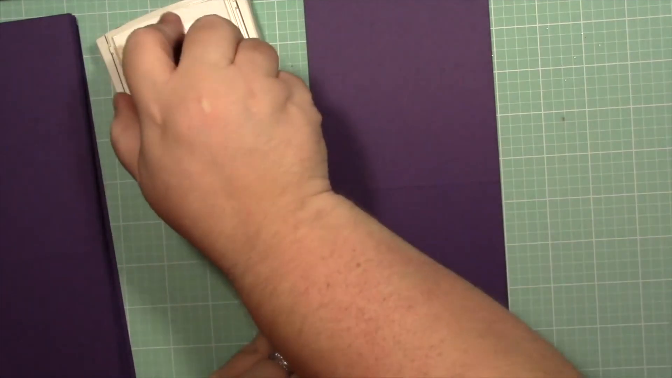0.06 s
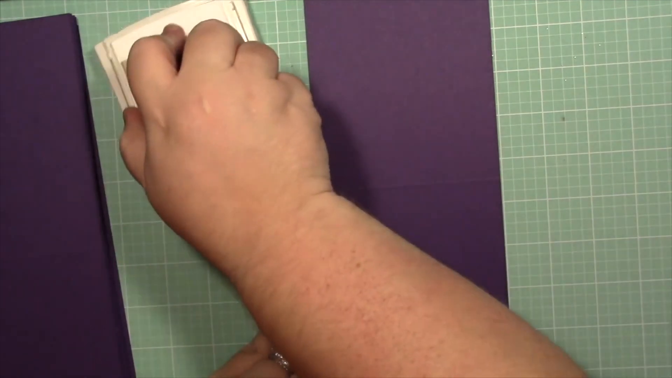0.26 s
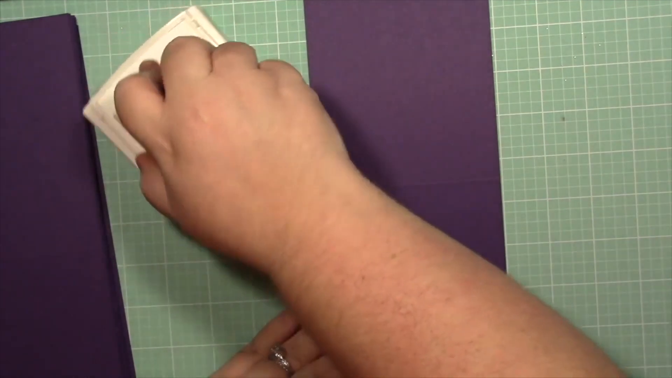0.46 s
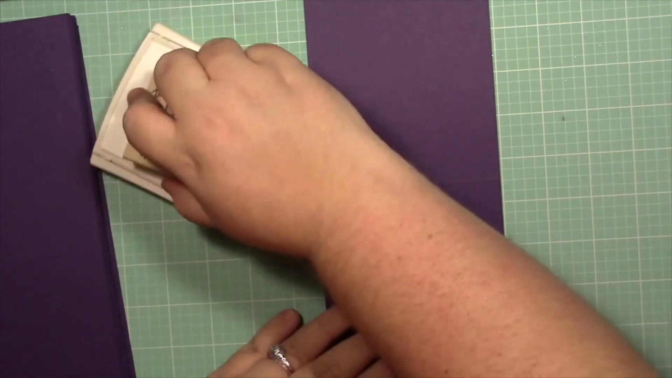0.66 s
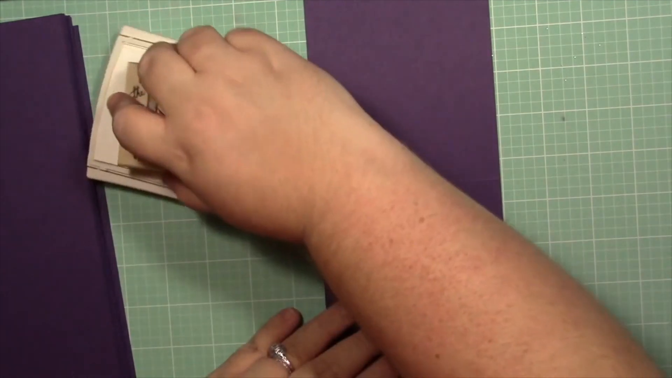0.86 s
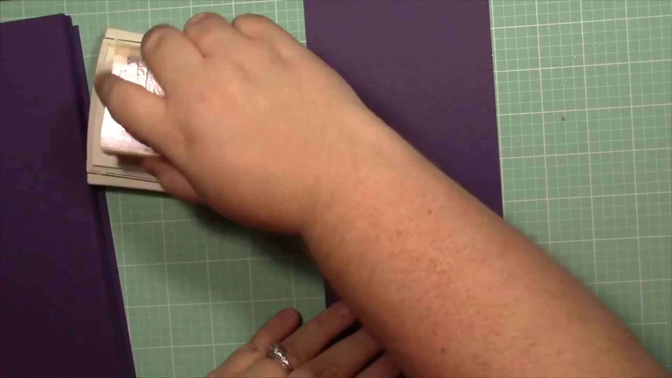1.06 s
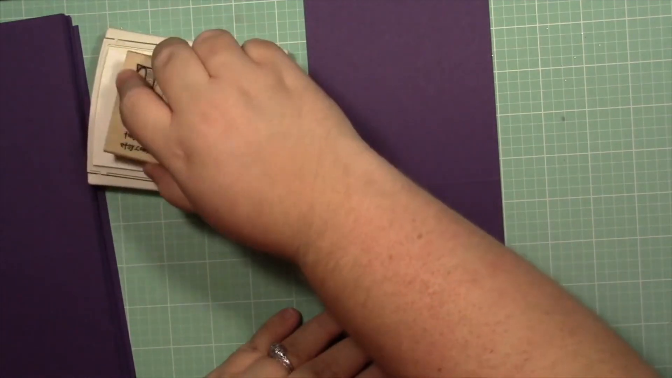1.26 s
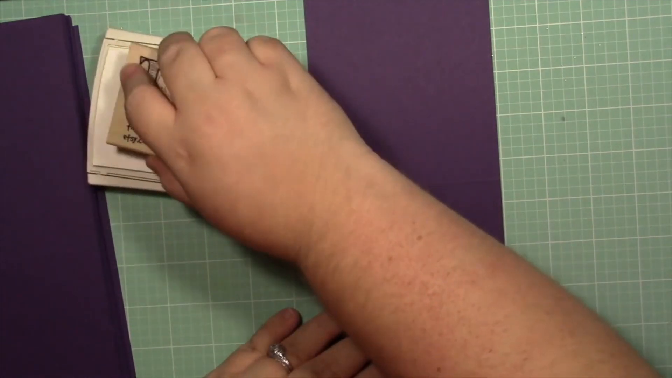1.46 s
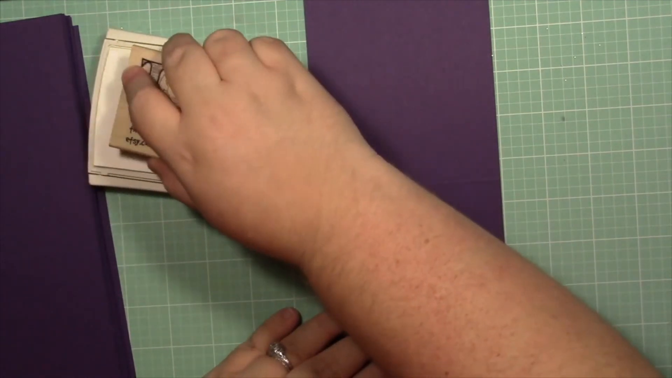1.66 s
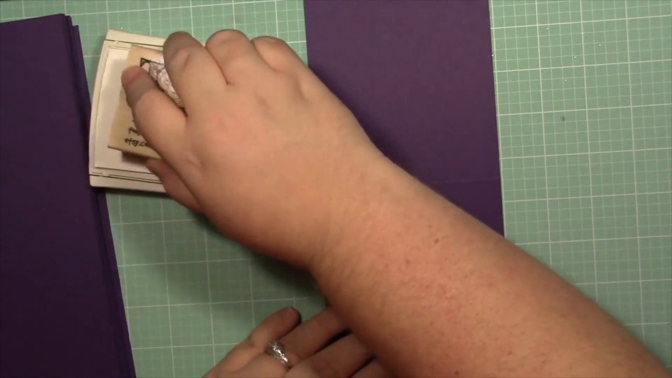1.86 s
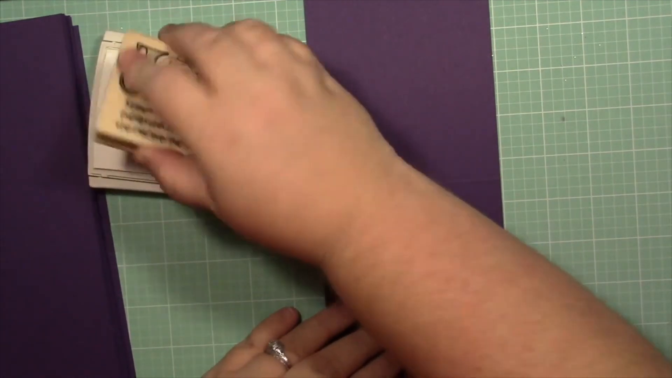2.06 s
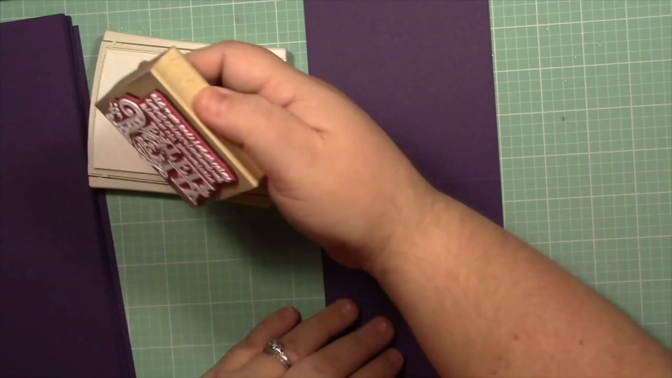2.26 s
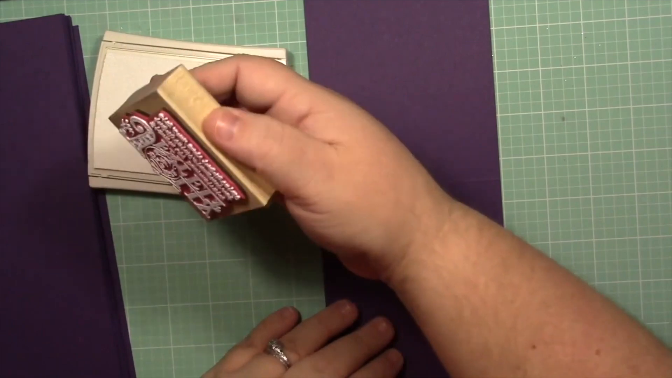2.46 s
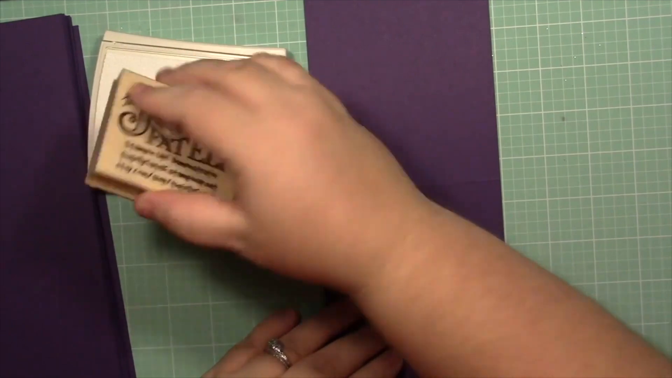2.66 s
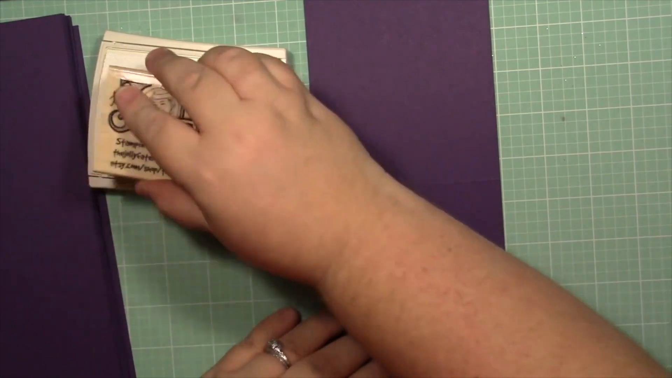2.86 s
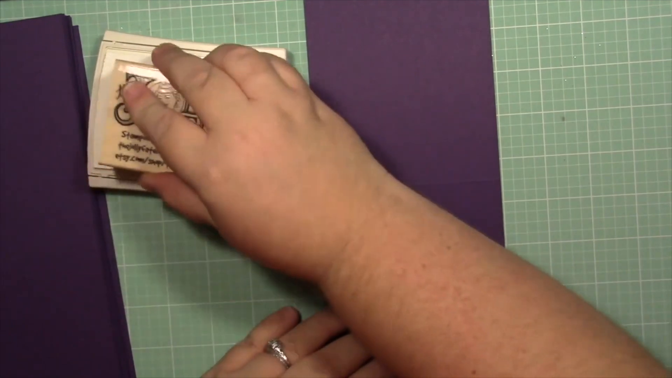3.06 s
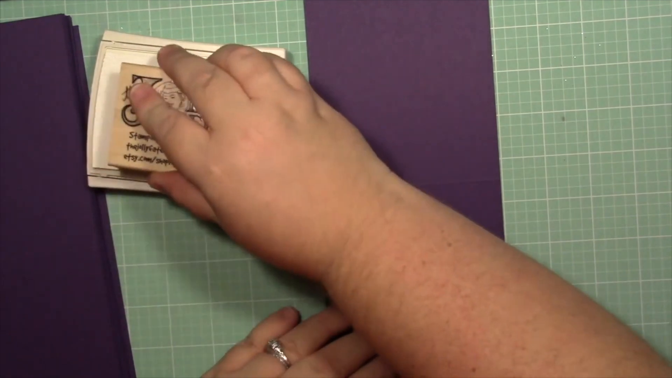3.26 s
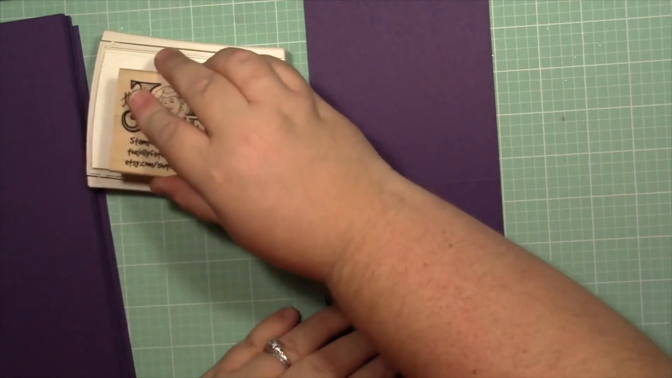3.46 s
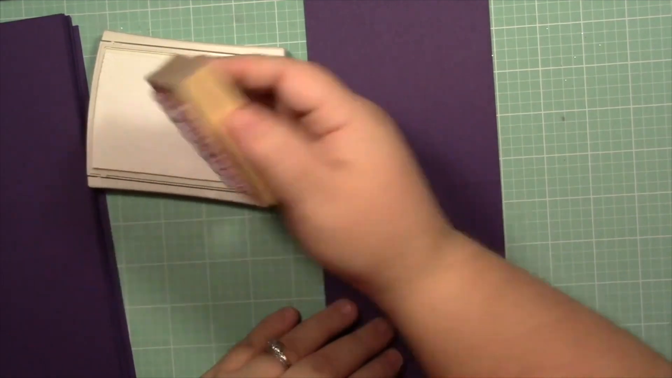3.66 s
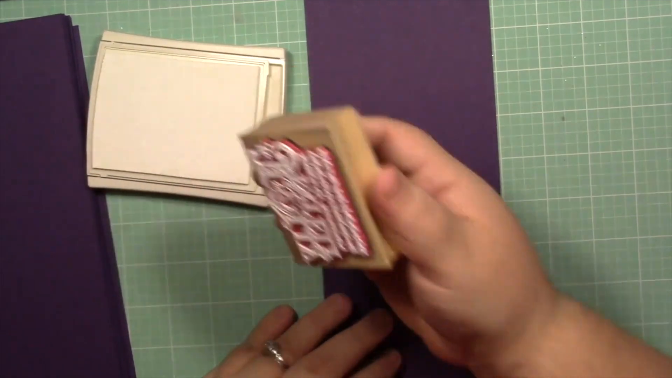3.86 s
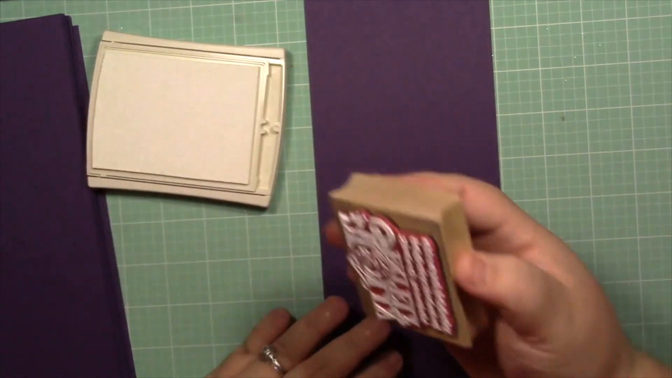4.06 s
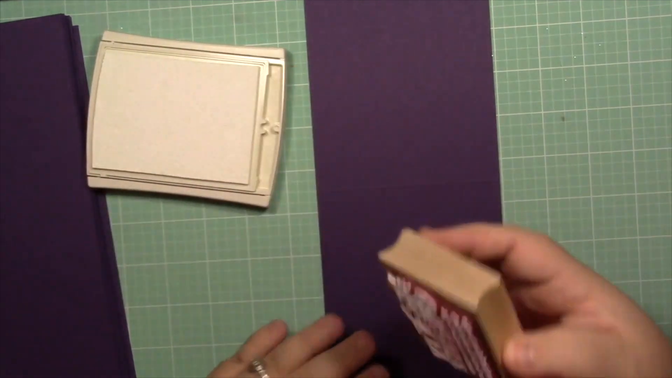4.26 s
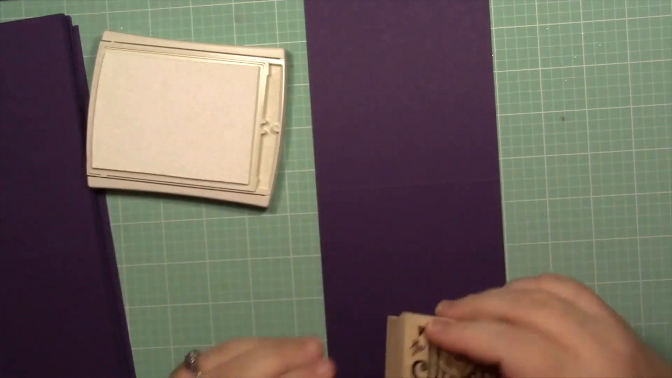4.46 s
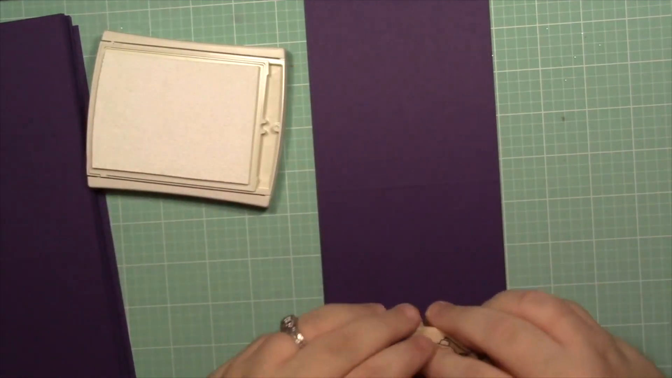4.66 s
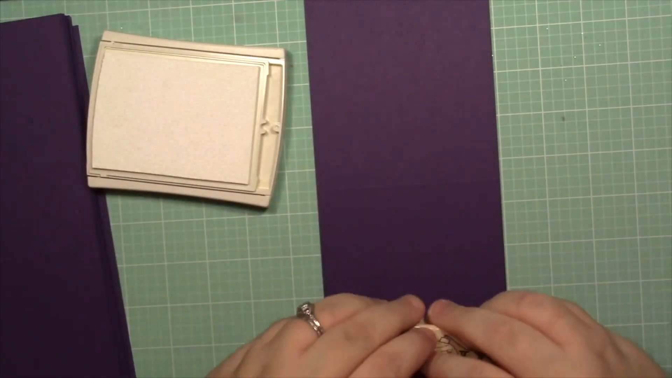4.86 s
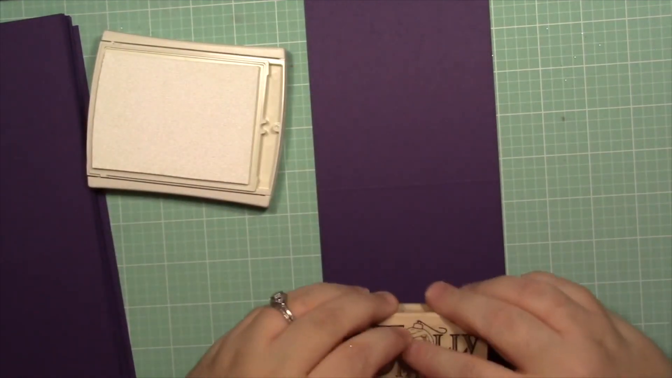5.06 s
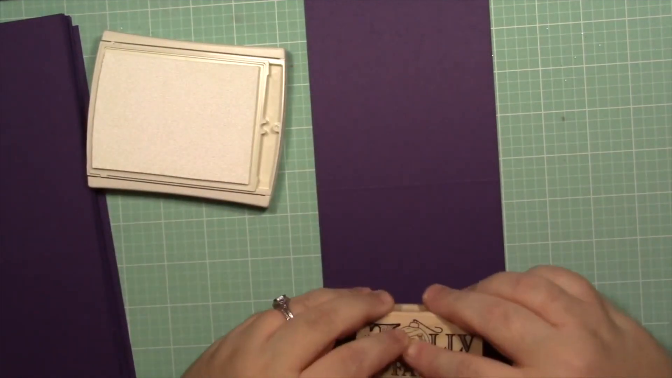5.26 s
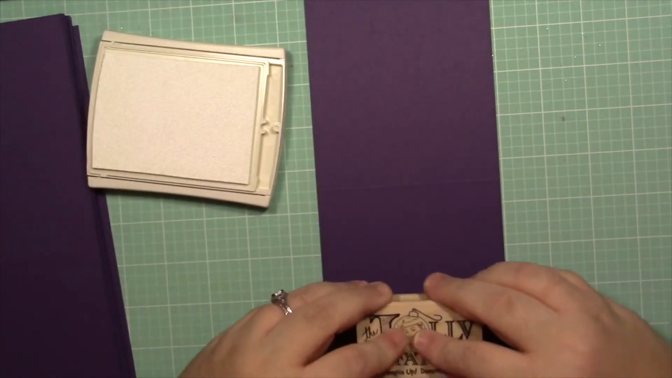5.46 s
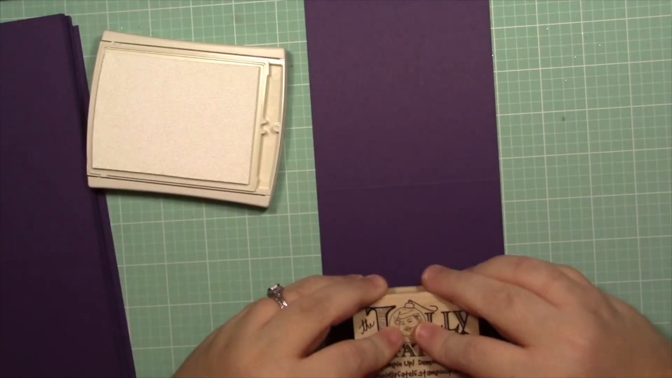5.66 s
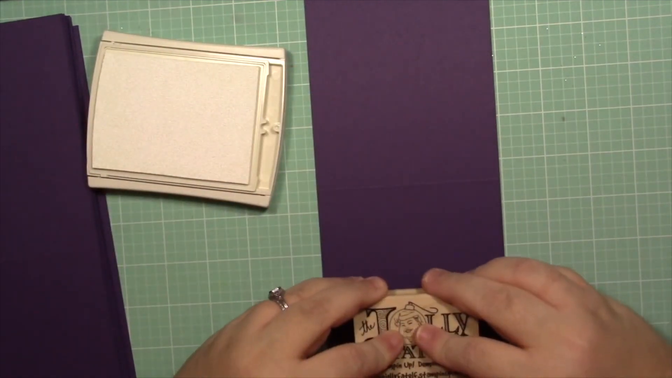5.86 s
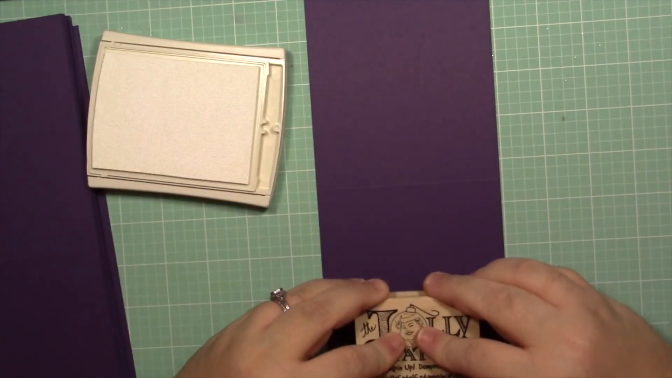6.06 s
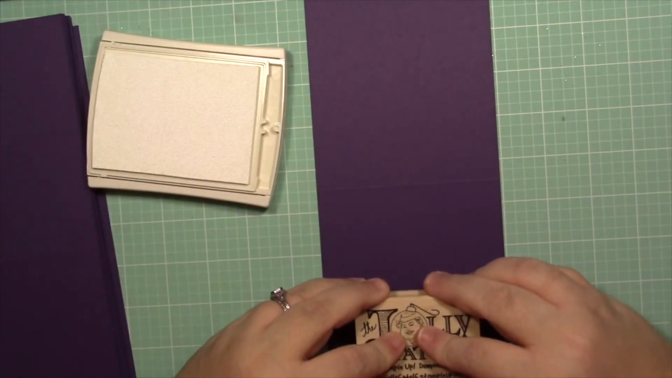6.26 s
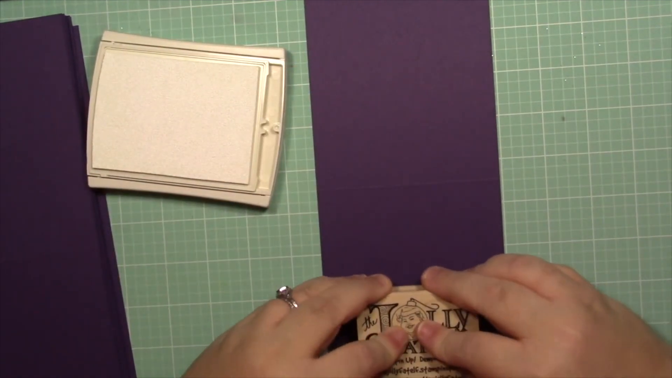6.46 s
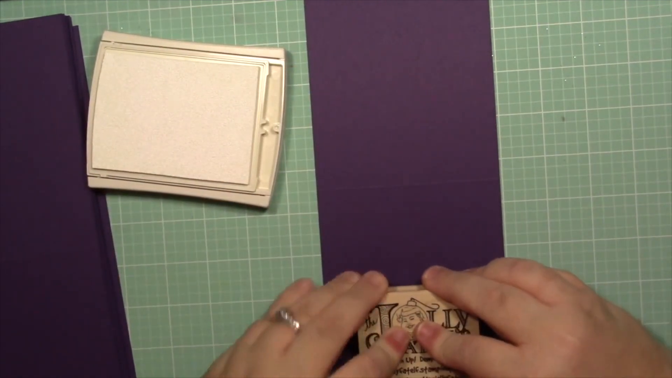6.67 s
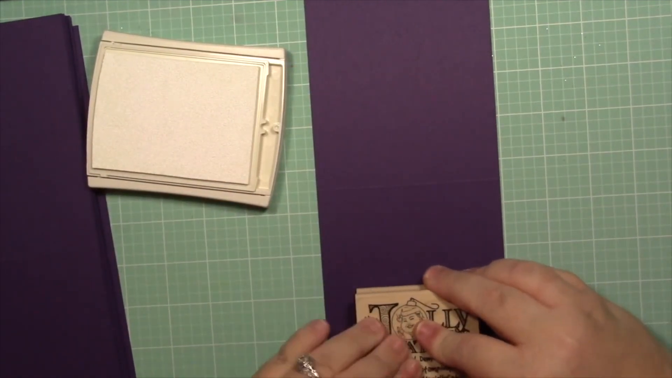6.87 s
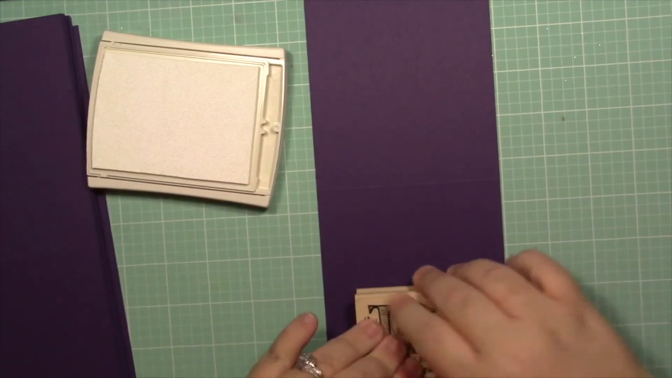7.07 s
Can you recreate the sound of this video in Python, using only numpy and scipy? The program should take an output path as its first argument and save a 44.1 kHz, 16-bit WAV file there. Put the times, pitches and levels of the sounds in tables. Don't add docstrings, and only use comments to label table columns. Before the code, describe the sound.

Close, dry craft-table sounds in a small room with a short reverberation. A medium wooden knock on a plastic ink pad comes at 0.15 s, over a faint table hum. From about 0.3 to 1.0 s the pad rasps over a mat in several short pushes, strongest near 0.45, with a slight squeal. A bunch of five hollow, sharp-edged knocks runs from 1.25 to 1.9 s, loud at 1.45 and 1.75 with lighter ones between. A second bunch runs from 2.9 to 3.5 s, loudest at 3.1, then fading. From 3.5 to 6.3 s there are only soft forearm rubs, sleeve and card rustle, fingertip pats and tiny sticky snaps, clustered near 5.05. At 6.45 s one firm, fuller knock lands on card and table, followed by pats and rustle. Faint motor ticks, about fifteen a second, and low room hiss continue throughout.

```python
import sys
import numpy as np
from scipy import signal
from scipy.fft import rfft, irfft, next_fast_len
from scipy.io import wavfile
from scipy.ndimage import uniform_filter1d

SR = 44100
rng = np.random.default_rng(int(sys.argv[2]) if len(sys.argv) > 2 else 0)


def unload_audio(sound):
    columns = np.transpose(np.atleast_2d(sound))
    steps = np.round(np.clip(columns, -1, 1) * 32767)
    wavfile.write(sys.argv[1], SR, steps.astype(np.int16))


def decibels_to_gain(level_db):
    exponent = np.asarray(level_db, float) / 20
    return 10 ** exponent


N = 313551
LEAD_S = 0.005
FRAME_PAIR_S = 1001 / 15000
CARD_FROM_S = 6

# start_s, force_db, block_pitch_hz, edge_crack_peak_db, table_thump_db
BLOWS = [(0.145, -23.5, 700, -26.5, -36.5), (1.2558, -31.5, 730, -33, -57.5), (1.4411, -9, 650, -9.5, -40),
         (1.613, -28, 606, -26, -48.5), (1.7621, -10.5, 622, -13.5, -40), (1.915, -21.5, 660, -23.5, -43.5),
         (2.9329, -21.5, 618, -16, -47.5), (3.1168, -9, 618, -9.5, -37), (3.2645, -23, 623, -19, -45.5),
         (3.407, -20, 542, -17.5, -38.5), (3.5, -30, 730, -26.5, -52), (6.4351, -5.5, 648, -15, -39)]
# until_s, lid_pitch_hz, rubber_squeeze_ms, lid_at_full_force_db,
# panel_against_lid_db
LANDING_SPOTS = [(1.1, 944, 1.8, -2, -13), (2.5, 962, 1.33, -5, -11.5), (3.3, 1000, 1.38, -8.5, -15),
                 (4.5, 1086, 0.8, -4.5, -18), (8.5, 1030, 1.2, -9.5, -28)]
# pitch_hz, level_db, t60_s
CASE_FLOOR = [(968.3, 3, 0.1), (730, -2, 0.091), (1176, -18, 0.19), (570.6, 0.5, 0.096), (647, -4, 0.18),
              (1540, -8, 0.047)]
# pitch_hz, level_db, t60_s
TABLE_TOP = [(91.4, -4, .33), (143.4, 11.5, 0.05), (201.6, 2, 0.18), (287.7, -6, 0.31)]
# centre_hz, width_hz, level_db
EDGE_ON_PAD = [(2646, 610, 4), (3330, 790, 2), (3950, 480, 4.5)]
# centre_hz, width_hz, level_db
EDGE_ON_CARD = [(1930, 760, -5), (2750, 540, -1), (3300, 570, -7), (4520, 300, -12)]
# centre_hz, width_hz, level_db
CONTACT_SIZZLE = [(5340, 500, -2), (6797, 180, 7), (8245, 2400, -6), (11000, 890, -13.5)]
# centre_hz, width_hz, level_db
BODY_AT_WALLS = [(740, 1300, 0)]
# centre_hz, width_hz, level_db
CRACK_AT_WALLS = [(3500, 4300, 0)]
# centre_hz, width_hz, level_db
SIZZLE_AT_WALLS = [(7000, 6900, 0)]
# delay_s, level_db
CEILING_ECHO = (.0132, -13)
# delay_s, level_db
WALL_ECHOES = [(0.022, -24), (.028, -25), (0.065, -32.5)]
# pitch_hz, t60_s
ROOM_DECAY = [(100, 1), (500, 0.38), (1500, 0.4), (4000, 0.42), (7000, 0.38), (12000, 0.92)]
# fastest_s, rasp_db, speeding_up_s, slowing_down_s
PAD_PUSHES = [
    (.305, -47, 0.047, 0.12),
    (.44, -37.5, 0.13, .1),
    (.574, -42.5, 0.073, 0.058),
    (.698, -53.5, 0.11, 0.05),
    (.89, -41.5, 0.1, 0.073),
    (1.03, -60, 0.2, 0.078),
]
# centre_hz, width_hz, level_db
CASE_RASP = [(1250, 300, -9), (1560, 260, -5), (1780, 120, 0), (2450, 250, -8)]
# centre_hz, width_hz, level_db
LID_SQUEAL = [(1743, 23, 16), (2480, 110, -8.5)]
# centre_hz, width_hz, level_db
SLIDE_DRONE = [(614, 210, 8.5), (1045, 320, 5)]
# pitch_hz, level_db_per_hz
SLIDE_HISS = [(1650, -37), (2800, -11), (3860, -13.5), (4210, -13.5), (4490, -17.5), (5980, -17.5),
              (6900, -22), (8370, -21), (15500, -37.5)]
# start_s, peak_db, centre_hz, body_against_peak_db
INK_SNAPS = [(.0378, -30, 6540, -17), (.1644, -43, 6440, -17), (1.0236, -45, 5030, 10),
             (1.2527, -47, 7000, -19), (1.268, -46, 7970, -20), (1.3352, -32.5, 6320, -24),
             (2.0075, -37, 6230, 6), (3.0268, -39.5, 5100, 16), (3.3396, -31.5, 6500, -3),
             (3.4946, -28.5, 6600, -18.5), (3.777, -47, 9800, 1), (3.828, -45, 9700, -20),
             (3.865, -54, 11000, -22), (4.2304, -49, 3000, -13), (4.7131, -49, 10000, -20),
             (4.8263, -45, 10000, -20), (4.9346, -46, 10900, -17), (5.0393, -33, 10150, -26),
             (5.0497, -34.5, 9950, -21), (5.0562, -29.5, 9560, -15), (5.0664, -32, 9800, -23),
             (6.003, -46, 3300, -2), (6.4774, -39, 3300, 0), (6.610, -48, 10200, 2),
             (6.6897, -53, 10500, -5), (6.7135, -48, 10000, -5), (6.757, -53, 7940, -5)]
# start_s, peak_db, pitch_hz
FINGER_PATS = [(4.0, -44, 487), (4.03, -48, 865), (4.93, -45, 875), (5.03, -54, 490), (6.03, -48, 860),
               (6.691, -33, 523), (6.713, -38, 298), (6.757, -45, 450), (6.79, -41, 298), (6.972, -40, 350)]
# fastest_s, level_db, speeding_up_s, slowing_down_s
FOREARM_RUBS = [(.01, -47.5, 0.056, 0.17), (3.56, -53.5, 0.07, 0.12), (3.85, -59, .15, .15),
                (4.01, -46.5, 0.045, 0.093), (4.25, -58, .04, .45), (4.79, -59, 0.15, .06),
                (4.94, -52.5, 0.037, 0.11), (5.04, -53.5, 0.098, 0.13), (6.01, -52.5, 0.044, 0.13),
                (6.59, -52, 0.03, 0.28), (6.72, -56, .06, 0.26), (7.03, -49, 0.1, 0.087)]
# fastest_s, cloth_db, speeding_up_s, slowing_down_s, card_db
SLEEVE_MOVES = [(3.82, -58, 0.37, 0.7, -65.5), (4.35, -57.5, 0.52, 0.25, -63.5),
                (4.7, -64.5, 0.45, .5, -69), (5.06, -59.5, .07, 0.076, -78), (6.005, -65, .06, .1, -70.5),
                (6.63, -59.5, 0.037, 0.33, -59.5), (7.02, -59.5, 0.096, 0.27, -64.5)]
# loudest_s, level_db, swell_s, fade_s
CARD_WHISTLE = [(4.87, -69, .26, .34)]
# pitch_hz, level_db_per_hz
RUB_COLOUR = [(150, -20), (250, -16.5), (429, -13), (492, -7), (666, -10.5), (876, -11), (2600, -23.5),
              (3380, -39), (5720, -120)]
# pitch_hz, level_db_per_hz
CLOTH_COLOUR = [(880, -25.5), (1500, -4.5), (2170, -12), (2730, -5), (3540, -8), (6000, -14), (7800, -40),
                (13200, -120)]
# pitch_hz, level_db_per_hz
CARD_COLOUR = [(3240, -32), (5500, -3), (10100, -4), (12300, -8), (13100, -7), (15500, -21.5)]
# start_s, extra_db
FIRM_MOTOR_STEPS = [(1.23, 4), (2.57, 6), (3.30, 4), (4.1, 3), (4.64, 3), (5.57, 4), (6.37, 8)]
# pitch_hz, level_db_per_hz
AIR_MID_COLOUR = [(15, -50.5), (25, -16.5), (59, -18.5), (97, -3.5), (149, 2.5), (309, 0.5), (384, 1),
                  (818, -4.5), (1020, -6), (1130, -7), (2160, -12), (2610, -14), (4250, -16),
                  (11300, -26.5), (16000, -35.5)]
# pitch_hz, level_db_per_hz
AIR_SIDE_COLOUR = [(15, -33.5), (25, -10.5), (335, 3.5), (451, 2), (1330, -7.5), (2280, -11.5), (4490, -30),
                   (6050, -35.5), (6560, -40), (16000, -46)]
# pitch_hz, level_db
MIC_RESPONSE = [(20, -30), (45, -6.5), (75, -1), (14000, -4.5), (16300, -23)]


def stamp(out):
    t = np.arange(SR // 3) / SR
    for s, force_db, block_hz, crack_db, thump_db in BLOWS:
        spot = next(spot for spot in LANDING_SPOTS if s < spot[0])
        rise = np.clip(spot[2], 0.6, 4) / 1000
        on_pad = s < CARD_FROM_S
        body = block_and_case(t, force_db, block_hz, spot, rise)
        crack, sizzle = edge_contact(t, crack_db, rise, on_pad)
        edge_hz = 1460 if on_pad else 1600
        thinned = filtered(push(t, BODY_AT_WALLS, body), lambda f: decibels_to_gain(-8 / (1 + (edge_hz / (f + 1)) ** 10)))
        sent = decibels_to_gain(-14) * body + decibels_to_gain(-9) * thinned + decibels_to_gain(-31) * push(t, SIZZLE_AT_WALLS, sizzle)
        crack_sent_db = -9 if on_pad else -19
        sent = sent + decibels_to_gain(crack_sent_db) * (push(t, CRACK_AT_WALLS, crack) + 0.22 * crack)
        echoes = sum(decibels_to_gain(db) * np.roll(body, round(lag * SR)) for lag, db in [CEILING_ECHO, *WALL_ECHOES])
        dry = (body + echoes) * [[1], [0.015]] + crack * [[1], [-0.04]] + sizzle * [[1], [-0.07]]
        add(out, room(dry, sent, side_db=-26), s - LEAD_S)
        add(out, decibels_to_gain(thump_db + 8) * thump(t), s - 0.002)
    add(out, decibels_to_gain(-31.5) * thump(t + 0.039), 0)


def block_and_case(t, force_db, block_hz, spot, rise):
    _, lid_hz, _, spot_db, panel_db = spot
    lid_db = spot_db + 0.64 * force_db
    hollow_db = -22 + 0.48 * force_db
    rim_db = lid_db - 10.5
    since = t - LEAD_S
    late = np.clip(since, 0, None)
    swell = np.exp(-((since - 0.002) / np.where(since < 0.002, rise, 0.0028)) ** 2)

    def wave(hz, t60, share):
        ringing = share * (late > 0.002) * decibels_to_gain(-60 * late / t60)
        return (swell + ringing) * np.cos(2 * np.pi * hz * (since - 0.0019))

    block = decibels_to_gain(force_db + 5.5) * wave(block_hz, t60=0.05, share=0.12)
    hollow = decibels_to_gain(hollow_db + 4.5) * wave(370, t60=0.02, share=0.2)
    lid = wave(lid_hz, t60=0.05, share=0.16) - 0.71 * wave(1217, t60=0.03, share=0.44)
    rim = wave(1647, t60=0.013, share=0.23) - 0.16 * wave(2015, t60=0.017, share=0.17)
    floor = sum(decibels_to_gain(db + 2 * rng.standard_normal()) * ring(late, hz, t60, rise=0.004)
                for hz, db, t60 in CASE_FLOOR)
    return block + hollow - decibels_to_gain(lid_db) * lid - decibels_to_gain(rim_db + 5) * rim + decibels_to_gain(lid_db + panel_db) * floor


def edge_contact(t, crack_db, rise, on_pad):
    since = t - LEAD_S
    late = np.clip(since, 0, None)
    burst = (late > 0) * np.exp(-(late / 0.004) ** 2)
    trail = 0.08 * (since > -rise) * decibels_to_gain(-60 * late / 0.027)
    grit = rng.standard_normal(len(t)) * (burst + trail)
    grit[round(LEAD_S * SR) + 8] -= 9
    edge = filtered(grit, peaks(EDGE_ON_PAD if on_pad else EDGE_ON_CARD))
    crack = decibels_to_gain(crack_db) * top(filtered(edge, peaks([(3000, 6600, 0)])))
    sizzle_db = -11.5 + 1.51 * crack_db
    sizzle = decibels_to_gain(sizzle_db + 11.5) * top(filtered(grit, peaks(CONTACT_SIZZLE)))
    return crack, sizzle


def thump(t):
    modes = [decibels_to_gain(db + 3.1 * rng.standard_normal())
             * ring(t, hz * (1 + 0.02 * rng.standard_normal()), t60, rise=0.004) for hz, db, t60 in TABLE_TOP]
    return sum(modes) * [[1], [0.03]]


def slide():
    rasp_db = strokes(PAD_PUSHES)
    grain = unit(decibels_to_gain(1.8 * unit(uniform_filter1d(rng.standard_normal(N), size=200))))
    squeal = decibels_to_gain(-4) * noise(peaks(LID_SQUEAL), patchy_db=1.5)
    rasp = decibels_to_gain(rasp_db) * (noise(peaks(CASE_RASP), patchy_db=0) + squeal)
    drone = decibels_to_gain(-17 + 0.58 * rasp_db) * noise(peaks(SLIDE_DRONE), patchy_db=3.5)
    hiss = decibels_to_gain(-23.5 + 0.63 * rasp_db) * noise(coloured(SLIDE_HISS), patchy_db=1.5)
    return grain * (rasp + drone + hiss)


def snaps(out):
    t = np.arange(SR // 20) / SR
    for s, peak_db, hz, body_db in INK_SNAPS:
        spit = rng.standard_normal(len(t)) * decibels_to_gain(-60 * t / 0.013)
        band = peaks([(0.47 * hz, 0.15 * hz, -12), (hz, 0.3 * hz, 0), (1.3 * hz, 0.35 * hz, -3)])
        spit = top(filtered(spit, band))
        tap = decibels_to_gain(body_db) * ring(t, 520, t60=0.0091, rise=0.0021)
        dry = spit * [[1], [-0.12]] + tap * [[1], [0]]
        add(out, decibels_to_gain(peak_db) * room(dry, decibels_to_gain(-12.5) * (spit + tap), side_db=-22), s)


def fingers(out):
    t = np.arange(SR // 20) / SR
    for s, peak_db, hz in FINGER_PATS:
        pat = ring(t, hz, t60=0.025, rise=0.0015) + 0.42 * ring(t, 0.52 * hz, t60=0.056, rise=0.002)
        add(out, decibels_to_gain(peak_db) * room(pat * [[1], [0.02]], decibels_to_gain(-12) * pat, side_db=-20), s)


def rustle():
    rub = decibels_to_gain(strokes(FOREARM_RUBS)) * noise(coloured(RUB_COLOUR), patchy_db=2.5)
    cloth_level = decibels_to_gain(strokes([row[:4] for row in SLEEVE_MOVES]))
    card_level = decibels_to_gain(strokes([(s, card_db, rise, fall) for s, _, rise, fall, card_db in SLEEVE_MOVES]))
    cloth = cloth_level * noise(coloured(CLOTH_COLOUR), patchy_db=2.5)
    card = card_level * noise(coloured(CARD_COLOUR), patchy_db=4)
    whistle = decibels_to_gain(strokes(CARD_WHISTLE)) * noise(peaks([(8300, 350, 0)]), patchy_db=1)
    return rub * [[1], [-0.1]] + (cloth + card + whistle) * [[1], [0]]


def focus_motor(out):
    t = np.arange(SR // 40) / SR
    count = int(N / SR / FRAME_PAIR_S) + 1
    for k, (size, pitch, kick) in enumerate(rng.standard_normal((count, 3))):
        s = 0.0298 + k * FRAME_PAIR_S
        extra_db = sum(db for when, db in FIRM_MOTOR_STEPS if abs(when - s) < FRAME_PAIR_S / 2)
        start = ring(t, 1850 * (1 + 0.06 * pitch), t60=0.013, rise=0.0007)
        start = start + (0.15 + 0.04 * extra_db) * ring(t, 4000, t60=0.013, rise=0.0005)
        stop = ring(t, 2100 * (1 + 0.04 * kick), t60=0.011, rise=0.0007)
        stop = np.roll(stop, round(0.0036 * SR))
        step = decibels_to_gain(-41 + 0.9 * size) * (decibels_to_gain(-3.5 + extra_db + 1.2 * kick) * start + stop)
        add(out, step * [[1], [-0.25]], s)


def air():
    hiss = decibels_to_gain(-58) * noise(coloured(AIR_MID_COLOUR), patchy_db=0)
    whine = decibels_to_gain(-86.5) * noise(peaks([(11250, 300, 0)]), patchy_db=-0.5)
    side = decibels_to_gain(-64) * noise(coloured(AIR_SIDE_COLOUR), patchy_db=-1.5)
    return np.array([hiss + whine, side])


def room(dry, sent, side_db):
    hz, t, z = signal.stft(rng.standard_normal((2, SR // 2)), SR, nperseg=256)
    decay = decibels_to_gain(-60 * t / along(ROOM_DECAY, hz)[:, None])
    tail = signal.istft(z * decay, SR, nperseg=256)[1]
    tail = tail * np.clip(np.arange(tail.shape[1]) / SR / 0.0056 - 0.6, 0, 1)
    tail = tail / np.linalg.norm(tail[0]) * decibels_to_gain([[0], [side_db]])
    out = signal.fftconvolve(sent[None], tail, axes=1)
    add(out, dry, 0)
    return out


def push(t, table, like):
    impulse = 1.0 * (np.arange(len(t)) == round(LEAD_S * SR))
    x = filtered(impulse, lambda f: np.abs(peaks(table)(f)) ** 3)
    return x * np.linalg.norm(like) / np.linalg.norm(x)


def ring(t, hz, t60, rise):
    return np.sin(2 * np.pi * hz * t) * decibels_to_gain(-60 * t / t60) * (1 - np.exp(-(t / rise) ** 2))


def strokes(rows):
    t = np.arange(N) / SR
    bells = [decibels_to_gain(2 * db - 40 * ((t - s) / np.where(t < s, rise, fall)) ** 2) for s, db, rise, fall in rows]
    return 10 * np.log10(sum(bells) + 1e-30)


def noise(response, patchy_db):
    z = signal.stft(rng.standard_normal(N), nperseg=256)[2]
    patches = uniform_filter1d(rng.standard_normal(z.shape), size=5, axis=0)
    patches = uniform_filter1d(patches, size=8, axis=1)
    patchy = signal.istft(z * decibels_to_gain(patchy_db * unit(patches)), nperseg=256)[1][:N]
    return unit(filtered(patchy, response))


def peaks(table):
    def response(f):
        return sum((-1) ** k * decibels_to_gain(db) * 1j * f * width / (hz * hz - f * f + 1j * f * width)
                   for k, (hz, width, db) in enumerate(table))
    return response


def coloured(points):
    return lambda f: decibels_to_gain(along(points, f))


def filtered(x, response):
    m = next_fast_len(x.shape[-1] + 8192)
    return irfft(rfft(x, m) * response(np.fft.rfftfreq(m, 1 / SR)), m)[..., :x.shape[-1]]


def along(points, hz):
    f, v = np.transpose(points)
    return np.interp(np.log(hz + 1), np.log(f + 1), v)


def unit(x):
    return x / np.sqrt(np.mean(x ** 2) + 1e-20)


def top(x):
    return x / np.abs(x).max()


def add(out, x, s):
    part = out[:, round(s * SR):][:, :x.shape[1]]
    part += x[:, :part.shape[1]]


def scene():
    out = np.zeros((2, N))
    stamp(out)
    snaps(out)
    fingers(out)
    focus_motor(out)
    nearby = out + slide() * [[1], [0.01]] + rustle()
    mid, side = filtered(nearby, coloured(MIC_RESPONSE)) + air()
    return np.array([mid + side, mid - side])


def low_pass(x):
    return signal.sosfilt(signal.butter(12, 16510, fs=SR, output="sos"), x)


def record(dry):
    mix = filtered(dry, lambda f: 1 / (1 + (f / 16300) ** 60))
    return low_pass(mix)


dry = scene()
out = record(dry)
unload_audio(out)
```